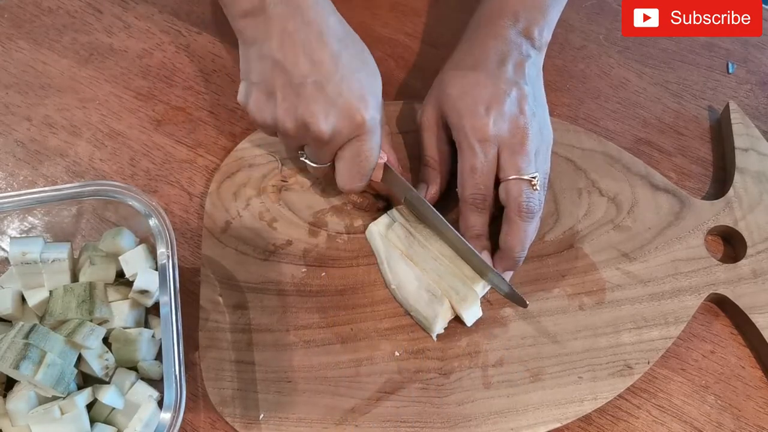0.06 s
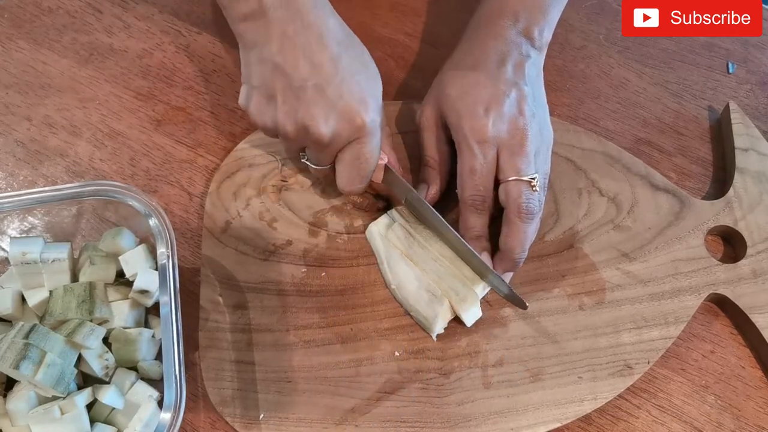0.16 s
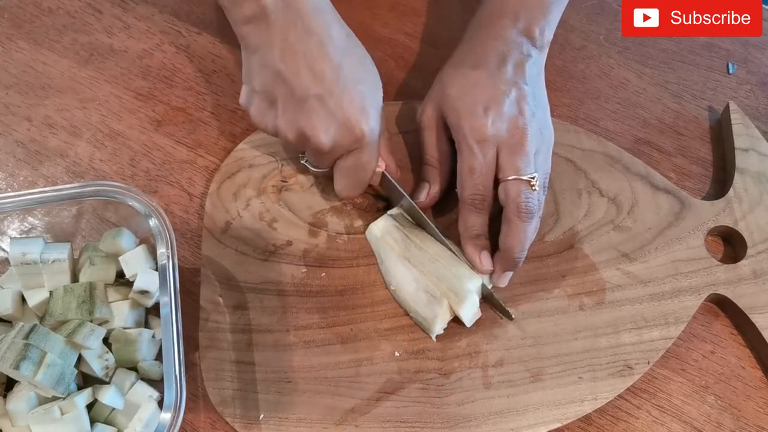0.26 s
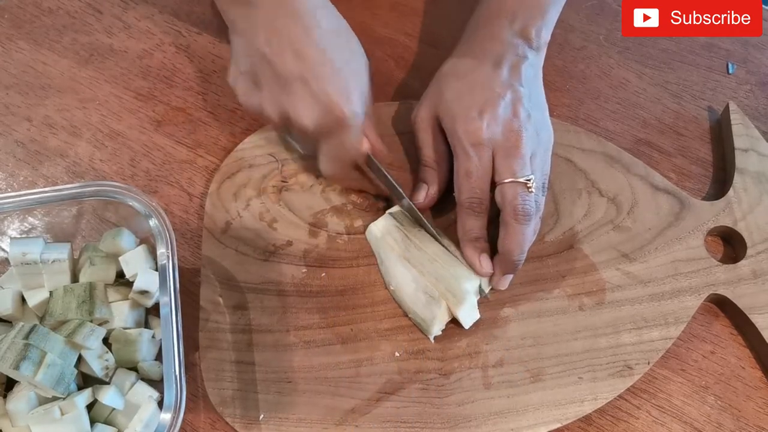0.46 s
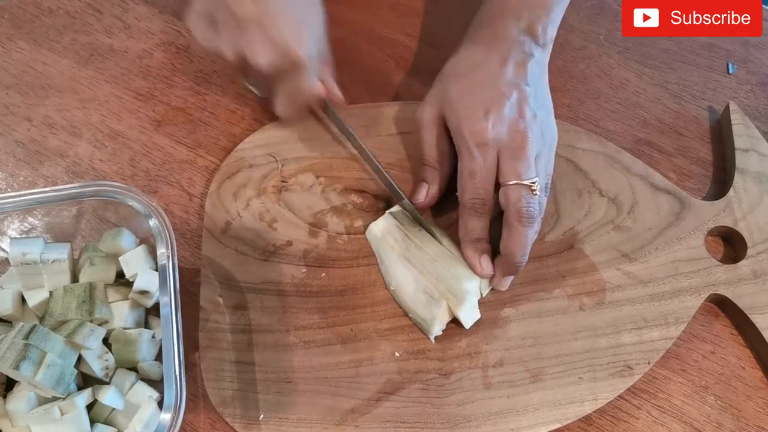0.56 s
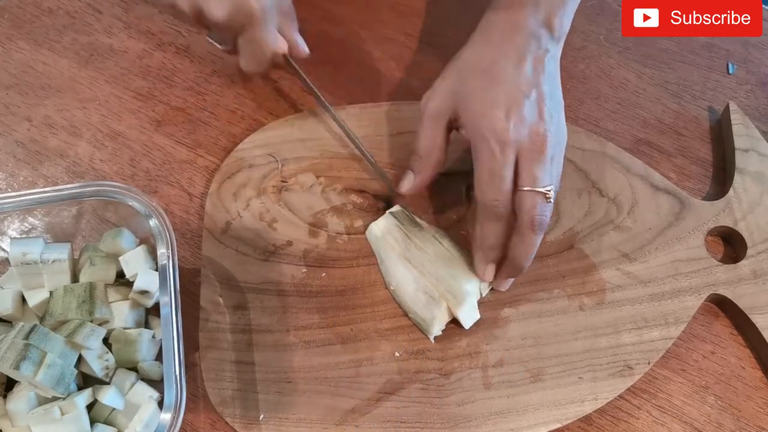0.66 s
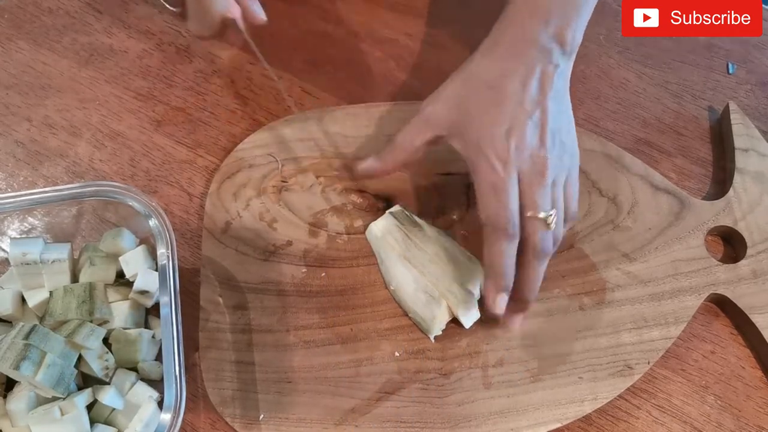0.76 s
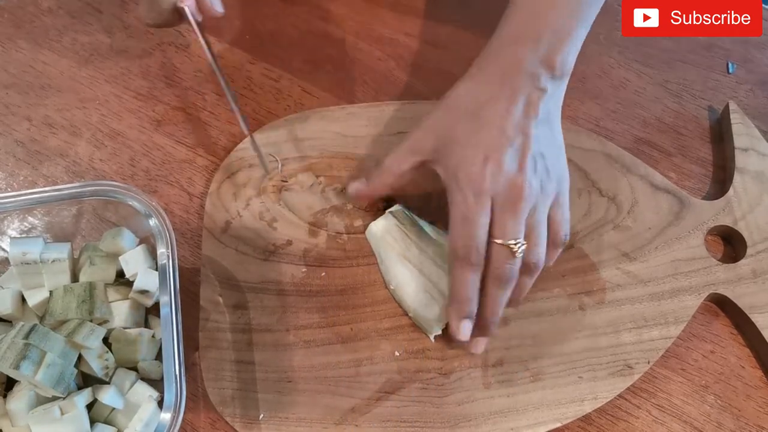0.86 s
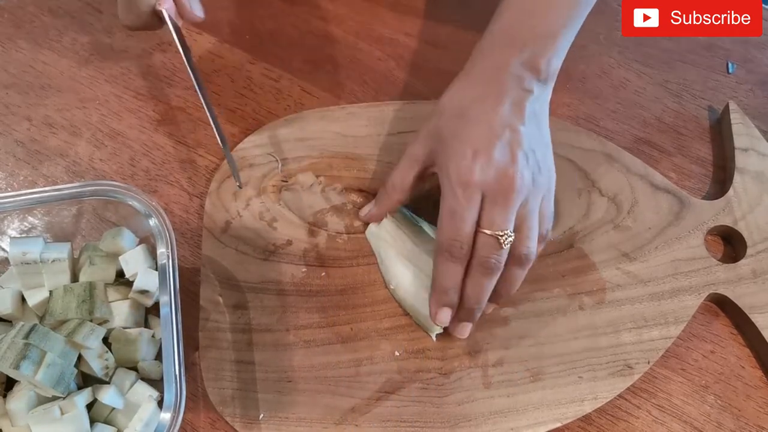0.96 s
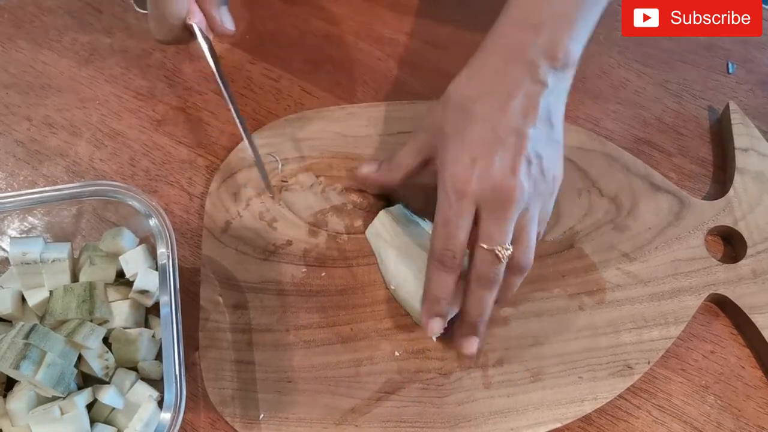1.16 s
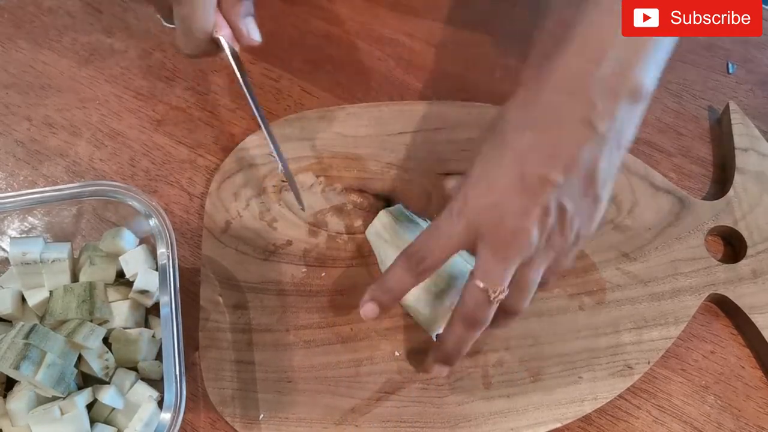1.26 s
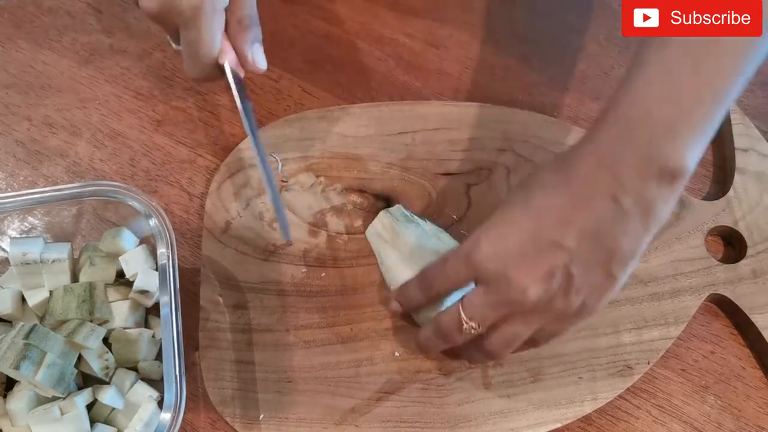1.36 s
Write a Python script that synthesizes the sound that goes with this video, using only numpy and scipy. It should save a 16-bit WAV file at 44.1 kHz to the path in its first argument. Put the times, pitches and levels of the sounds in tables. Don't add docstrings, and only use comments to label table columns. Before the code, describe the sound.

One knife chop: a brief crisp crunch and a loud woody knock on a cutting board, then a short scrape as the blade is dragged out, close up in a reverberant kitchen with faint fan hum.

```python
import sys
import numpy as np
from scipy import signal
from scipy.fft import rfft, irfft
from scipy.io import wavfile

SR = 44100
rng = np.random.default_rng(int(sys.argv[2]) if len(sys.argv) > 2 else 0)


def master(y):
    cut = np.clip(np.atleast_2d(y).T, -1, 1)
    pcm = np.round(cut * 32767)
    wavfile.write(sys.argv[1], SR, pcm.astype(np.int16))


def invert_db(x):
    u = np.asarray(x, float) / 20
    return 10 ** u


N = 61739


def rms_one(x):
    return x / np.sqrt(np.mean(x ** 2) + 1e-20)


def in_time(rows):
    s, *columns = np.transpose(rows)
    return [np.interp(np.arange(N) / SR, s, c, -140, -140) for c in columns]


def at_hz(points, hz):
    table_hz, values = np.array(points).T
    return np.interp(np.log(hz), np.log(table_hz), values)


def spectrum_hz():
    return np.maximum(np.arange(N // 2 + 1) * SR / N, 1)


def band_pass(x, band_hz):
    return signal.sosfilt(signal.butter(2, band_hz, "band", fs=SR, output="sos"), x)


def pan(x, db):
    return x * invert_db(np.array([[db / 2], [-db / 2]]))


def pair(mid_side, alike):
    alike = np.clip(alike, -1, 1)
    mid = np.sqrt(1 + alike) * mid_side[0]
    side = np.sqrt(1 - alike) * mid_side[1]
    return mid + side * np.array([[1], [-1]])


def coloured(x, spectrum):
    hz = spectrum_hz()
    gain = invert_db(at_hz(spectrum, hz)) * (hz > spectrum[0][0] / 2)
    return rms_one(irfft(rfft(x) * gain, N))


def ring(x, hz, t60):
    r, w = invert_db(-60 / (t60 * SR)), 2 * np.pi * hz / SR
    return signal.lfilter([0, np.sin(w)], [1, -2 * r * np.cos(w), r * r], x + 1e-18)


def clicks(rows):
    out = np.zeros(N)
    for s, db in rows:
        out[int(s * SR)] += invert_db(db)
    return out


def grains(per_s, spread_db):
    loudness = spread_db * np.minimum(rng.exponential(1, (2, N)), 4)
    sizes = invert_db(loudness) * rng.choice([-1, 1], (2, N))
    return sizes * (rng.random((2, N)) < per_s / SR)


def crunch(curve_db, colour, per_s, alike, pan_db):
    noise = coloured(pair(grains(per_s, spread_db=4.0), alike), colour)
    return pan(invert_db(curve_db) * noise, pan_db)


def air():
    # f/Hz, density/dB per Hz
    air_colour = [(55, -16), (90, -6), (220, -15.5), (600, -14.5), (1300, -18), (2400, -16.5), (4200, -29),
                  (15800, -47)]
    # f/Hz, coherence/1
    air_likeness = [(60, 0.94), (130, .85), (290, .7), (640, -0.018), (1400, -0.1), (3100, -0.017),
                    (7000, -0.099)]
    # f/Hz, level/dB
    hum_tones = [(32.3, -64.5), (70.0, -68), (199.2, -70), (301.5, -87), (457.6, -70.5), (640.6, -68),
                 (855.9, -86.5), (958.2, -72.5)]
    # t/s, level/dB
    rumble_curve = [(0.0, -49), (0.302, -61), (0.322, -60), (0.474, -59.5), (0.528, -92), (0.564, -71),
                    (0.684, -61.5), (0.77, -80), (0.926, -52), (0.968, -53), (1.004, -75), (1.112, -53.5),
                    (1.374, -71.5), (1.4, -63)]
    white = rfft(rng.standard_normal((2, N)))
    hiss = coloured(irfft(pair(white, at_hz(air_likeness, spectrum_hz())), N), air_colour)
    hum, hum_width_hz = 0, 6.0
    hum_t60 = np.log(1000) / np.pi / hum_width_hz
    for hz, db in hum_tones:
        tone = ring(rng.standard_normal((2, N + SR)), hz, hum_t60)[:, SR:]
        hum = hum + invert_db(db) * rms_one(pair(tone, at_hz(air_likeness, hz)))
    low = band_pass(rng.standard_normal((2, N + SR)), [25, 39])[:, SR:]
    rumble = pan(invert_db(in_time(rumble_curve)[0]) * rms_one(pair(low, 0.89)), 1.5)
    return invert_db(-57.5) * hiss + hum + rumble


def earlier_slide():
    # t/s, level/dB
    slide_force = [(0.0, -61), (0.012, -56.5), (0.018, -61.5), (0.178, -72.5), (0.2, -68)]
    # f/Hz, density/dB per Hz
    slide_colour = [(2060, -31.5), (3500, -9), (4800, -11), (6660, 2.5), (7320, -11), (8730, -1),
                    (15800, -12.5)]
    return crunch(in_time(slide_force)[0], slide_colour, per_s=8100, alike=0.37, pan_db=-4.5)


def table_pushes():
    # t/s, level/dB
    pushes = [
        (.001, -51.5),
        (.213, -41),
        (.2575, -43),
        (.376, -50.5),
    ]
    # f/Hz, level/dB, T60/s
    table_modes = [(127, -7.5, .4), (134, 3.5, 0.44), (144, -8.5, .4), (210.4, -11.5, 1), (240, -12, .45)]
    push = clicks(pushes)
    return sum(pan(invert_db(db) * ring(push, hz, t60), rng.normal(0, 3)) for hz, db, t60 in table_modes)


def bands():
    band_edges = 20 * 2 ** np.arange(0, 9.8, .4)
    white = rng.standard_normal((2, 2, SR))
    for k, (low, high) in enumerate(zip(band_edges, band_edges[1:])):
        yield np.sqrt(low * high), band_pass(white[k % 2], [low, high])


def kitchen(x):
    # f/Hz, T60/s
    room_t60 = [(300, 1), (1000, 0.72), (2000, .58), (5000, 1), (12000, 0.39)]
    # f/Hz, level/dB
    room_colour = [(300, -8.5), (560, 8), (800, -3), (1300, -4), (2000, -3), (3200, -3), (5000, -5),
                   (12000, -3.5)]
    rise_s = 0.0046
    t = np.arange(SR) / SR
    tail = 0
    for hz, band in bands():
        tail = tail + invert_db(at_hz(room_colour, hz) - 60 * t / at_hz(room_t60, hz)) * band
    tail = pair(tail * (1 - np.exp(-(t / rise_s) ** 2)), 0.21)
    tail = tail / np.sqrt(np.sum(tail ** 2) / 2)
    wet = signal.fftconvolve(tail, x.mean(axis=0)[None], axes=1)[:, :N]
    return pan(invert_db(-9.5) * wet, -4.5)


def wet_ticks():
    # t/s, peak level/dB, f/Hz
    tick_rows = [
        (.011, -46, 6200),
        (.012, -47, 9000),
        (.0115, -49, 11500),
        (.156, -61, 10000),
        (.992, -63, 9500),
        (.598, -56, 8600),
        (.598, -54, 4900),
        (.556, -36, 1950),
    ]
    ring_cycles = 12
    out = 0
    for s, db, hz in tick_rows:
        t60 = ring_cycles / hz
        drop = ring(ring(clicks([(s, 0)]), hz, t60), hz, t60)
        out = out + invert_db(db) * drop / np.abs(drop).max()
    return pan(out, -3.5)


def slice_through():
    # t/s, level/dB
    slice_force = [(.2, -62.5), (.209, -59), (.215, -33), (.226, -32), (.232, -42.5), (.24, -33.5),
                   (.246, -67)]
    # f/Hz, density/dB per Hz
    slice_colour = [(180, -38.5), (300, -27), (391, -8.5), (853, -3), (3790, -14), (4550, -10.5),
                    (6240, -12), (10300, -14), (15800, -23)]
    return crunch(in_time(slice_force)[0], slice_colour, per_s=14000, alike=.3, pan_db=-3)


def knock():
    # t/s, peak level/dB, f/Hz, contact/s, left-right/dB
    touches = [
        (.23792, -7.5, 2300, .0014, -7),
        (.23881, -4.8, 1920, .0016, -6),
        (.23756, -21, 1050, .003, -2),
        (.23794, -18, 2900, .0012, 7),
        (.23854, -21, 1400, .002, 3),
        (.2378, -25, 620, .004, -5),
    ]
    knock_band = [350, 3800]
    contact_edge, contact_skew = .6, .6
    t, out = np.arange(N) / SR, np.zeros((2, N))
    for s, db, hz, length, pan_db in touches:
        phase = np.clip((t - s) / length, 0, 1) ** contact_skew
        shape = np.abs(np.sin(np.pi * phase)) ** contact_edge * (t < s + length)
        out -= pan(invert_db(db) * shape * np.sin(2 * np.pi * hz * (t - s)), pan_db)
    return band_pass(out + 1e-18, knock_band)


def board_ringing():
    # f/Hz, level/dB, T60/s
    ringing_modes = [(532, -44, .4), (559, -43, 0.43), (575, -50, 0.79), (606, -42.5, 0.4),
                     (637, -45.5, 0.24), (665, -43.5, 0.35), (699, -43.5, 0.27), (815, -38, .2),
                     (930, -51, 0.46)]
    knock_s = .2385
    out = 0
    for k, (hz, db, t60) in enumerate(ringing_modes):
        mode = ring(clicks([(knock_s, db)]), hz, t60)
        out = out + pan(mode, rng.normal(-9, 3)) * (-1) ** k
    return out


def first_echoes(direct):
    # delay/s, left level/dB, right level/dB
    echo_paths = [(.0037, -12, -10), (.0074, -16, -26), (.0091, -26, -13), (.0165, -17, -24),
                  (.0198, -20, -17)]
    source, out = direct.mean(axis=0), 0
    for lag, left_db, right_db in echo_paths:
        out = out + np.roll(source, int(lag * SR)) * invert_db(np.array([[left_db], [right_db]]))
    return out


def drag_out():
    # t/s, hiss level/dB, board rub level/dB
    drag_curve = [(.4, -77, -51), (.46, -57.5, -51.5), (.525, -57, -46), (.535, -59, -42), (.55, -58, -46),
                  (.556, -57.5, -36), (.566, -58, -41.5), (.602, -57.5, -46), (.64, -82, -54.5)]
    # f/Hz, density/dB per Hz
    drag_colour = [(2500, -16), (3500, -5), (4700, 2), (5800, -6), (8400, -7.5), (10700, -7), (13000, -11),
                   (15800, -15)]
    # f/Hz, width/Hz, level/dB
    rubbed_modes = [(840, 144, -16.5), (1410, 200, -9.5), (1880, 410, -5.5), (2274, 290, -8.5),
                    (3080, 530, -19.5)]
    pan_db = -3.5
    hiss_db, rub_db = in_time(drag_curve)
    slips = pair(grains(per_s=3000, spread_db=3.0), .6)
    wood = 0
    for k, (hz, width_hz, db) in enumerate(rubbed_modes):
        wood = wood + (-1) ** k * invert_db(db) * np.sqrt(width_hz) * ring(slips, hz, 2.8 / width_hz)
    rub = pan(invert_db(rub_db) * rms_one(wood), pan_db)
    return rub + crunch(hiss_db, drag_colour, per_s=7700, alike=0.19, pan_db=pan_db)


def fingers():
    # t/s, level/dB
    finger_force = [(.65, -85), (.95, -84), (1.0, -72.5), (1.06, -84), (1.15, -78.5), (1.4, -87)]
    # f/Hz, density/dB per Hz
    finger_colour = [(6000, -9), (8700, -0.5), (9700, -9), (10700, 3), (11600, -10), (13000, -5),
                     (14200, -18), (15800, -14)]
    return crunch(in_time(finger_force)[0], finger_colour, per_s=9000, alike=0.25, pan_db=-2.6)


def scene():
    direct = knock()
    knife = earlier_slide() + wet_ticks() + slice_through() + direct + drag_out() + fingers()
    wood = table_pushes() + board_ringing()
    return air() + knife + first_echoes(direct) + kitchen(knife) + wood


def top_cut(x):
    return signal.sosfilt(signal.butter(12, 15970, fs=SR, output="sos"), x)


def record(dry):
    low_pass = signal.cheby2(12, 40, 15850, fs=SR, output="sos")
    mix = np.clip(signal.sosfilt(low_pass, dry), -1, 1)
    return top_cut(mix)


dry = scene()
out = record(dry)
master(out)
```